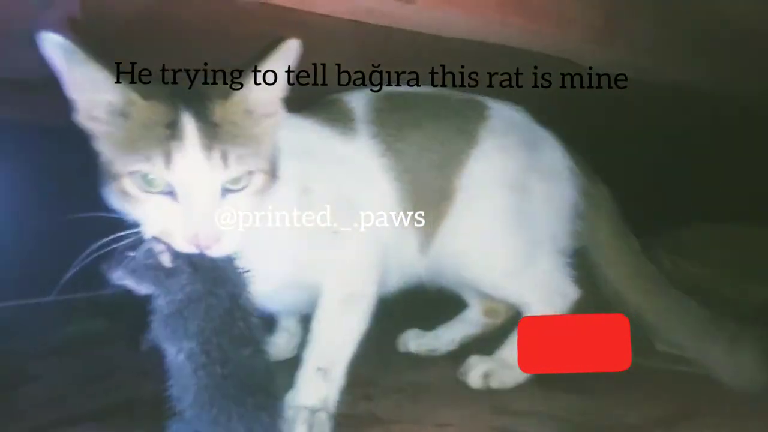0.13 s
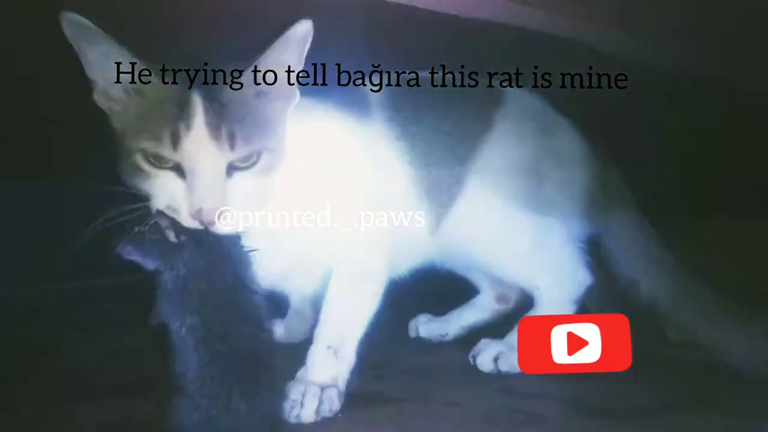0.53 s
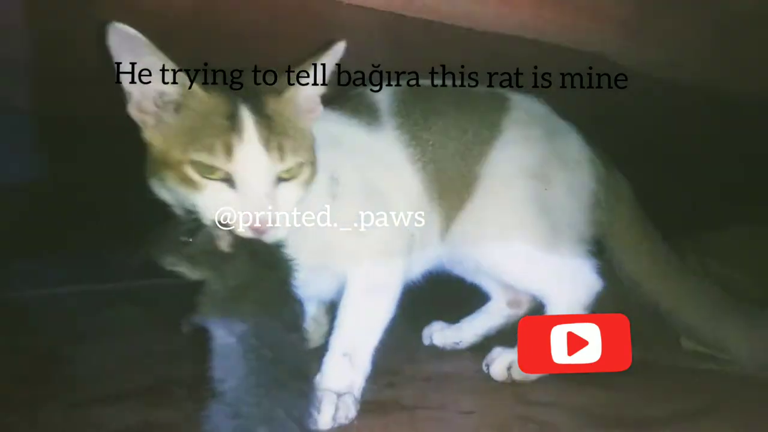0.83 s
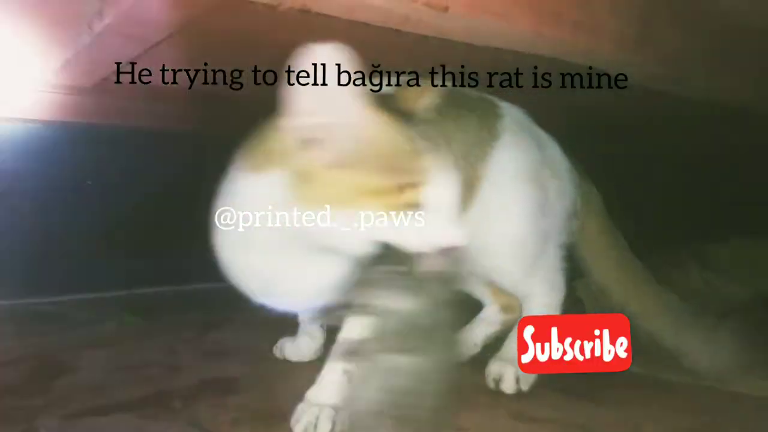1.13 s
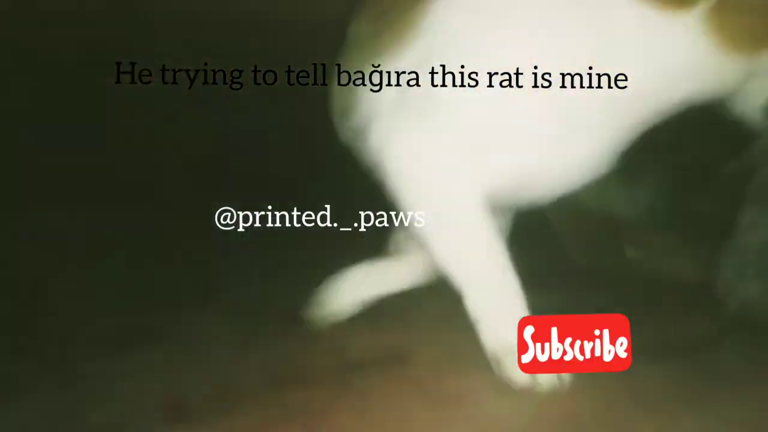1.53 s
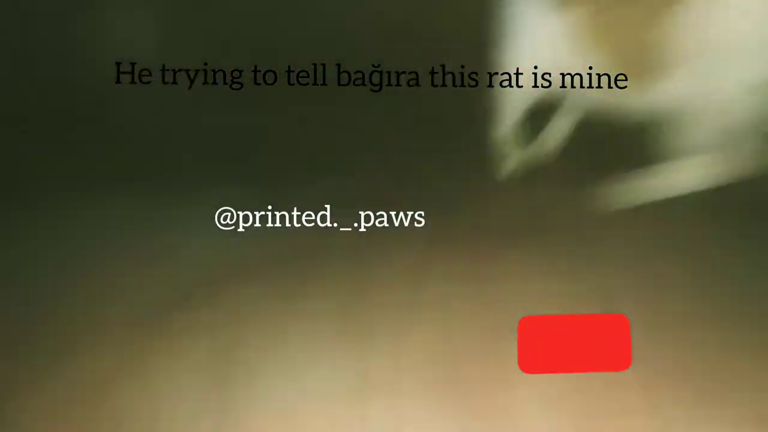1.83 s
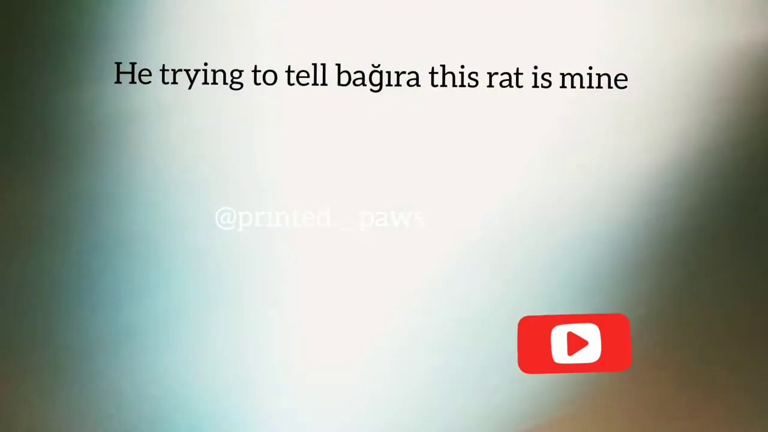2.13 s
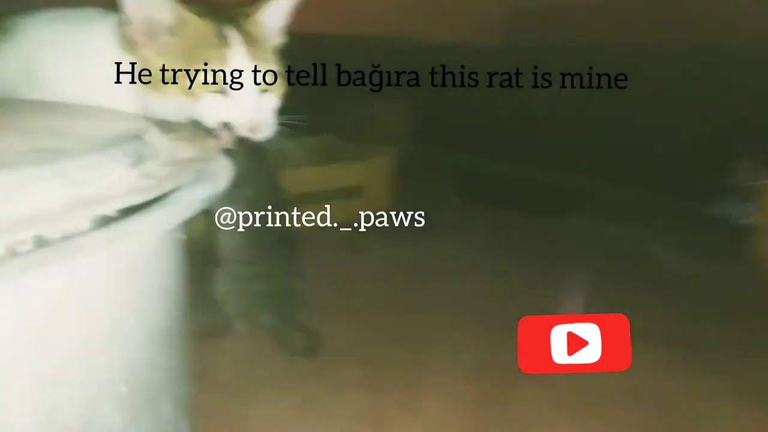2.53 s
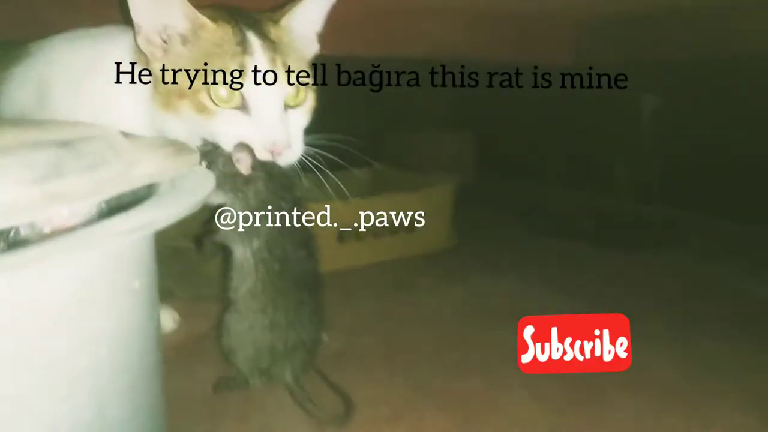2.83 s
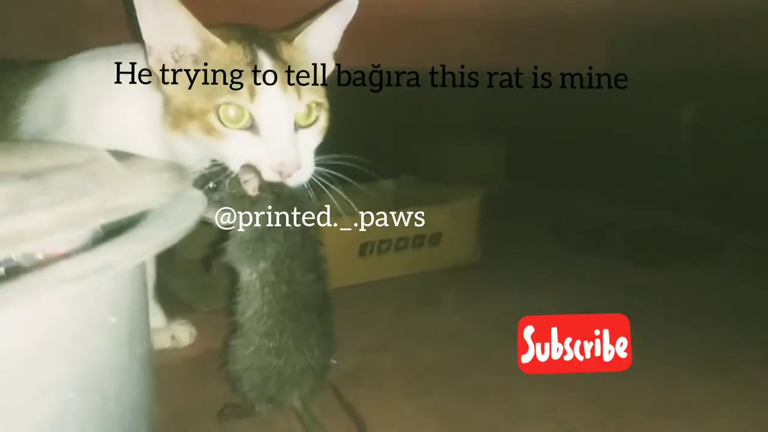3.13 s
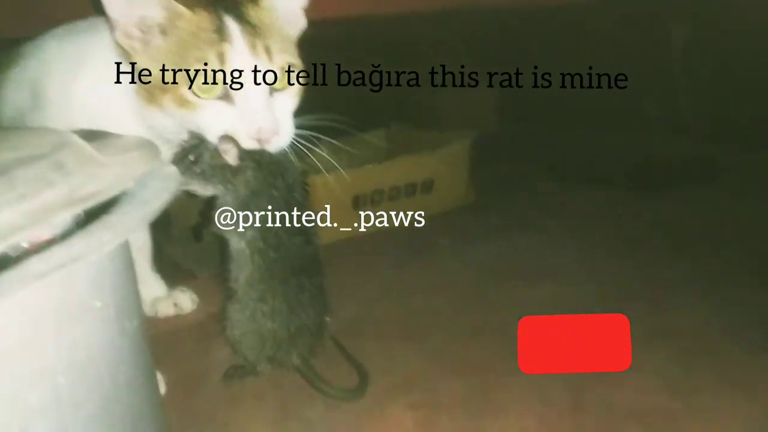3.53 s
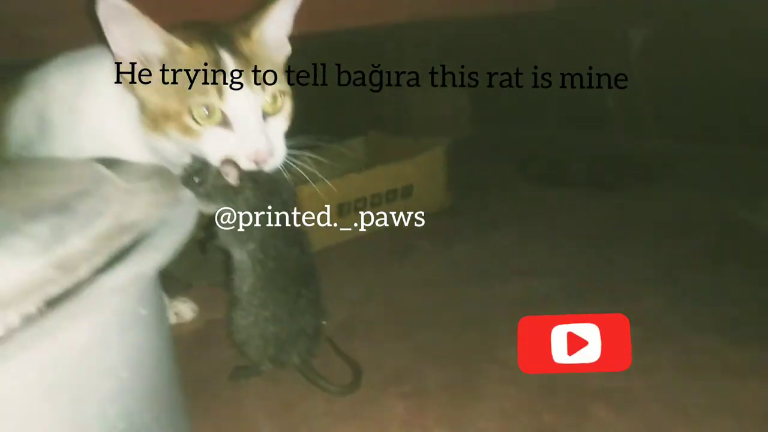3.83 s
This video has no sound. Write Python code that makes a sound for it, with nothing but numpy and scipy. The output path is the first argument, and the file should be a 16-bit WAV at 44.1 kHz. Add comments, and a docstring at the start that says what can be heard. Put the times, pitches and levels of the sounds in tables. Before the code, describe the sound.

A cat growls with a humming rasp, pauses, then growls again more unevenly in a quiet room at night. Close by are soft bumps, rustling clothes and a sharp tick on the left, while a cricket throbs faintly throughout.

```python
"""In a room at night, a cat with a rat in its jaws gives two long closed-mouth growls and slinks off
between them. Its vocal folds hum and flap, and the flaps make its throat and mouth ring with a rasp.
Clothes rustle as a hand-held phone follows close by, with soft bumps, scuffs, knocks and sharp ticks
on the left. Behind it all are the room's hush, a faint whine and a cricket that throbs throughout;
a second insect buzzes for about the first second."""
import sys
import numpy as np
from scipy import signal
from scipy.fft import rfft, irfft
from scipy.io import wavfile
from scipy.ndimage import uniform_filter1d

SR = 44100
rng = np.random.default_rng(int(sys.argv[2]) if len(sys.argv) > 2 else 0)


def bounce(signal):
    """Save signal as a 16-bit WAV file at the path given by the first command-line argument."""
    frames = np.transpose(np.atleast_2d(signal))
    limited = np.clip(frames, -1, 1)
    pcm = np.round(limited * 32767).astype(np.int16)
    wavfile.write(sys.argv[1], SR, pcm)


N = 176400  # 4 seconds


def undb(db):
    """Turn decibels into a gain to multiply by."""
    return 10 ** (np.asarray(db) / 20)


def unit(x):
    """Scale a signal to an average strength (rms) of 1."""
    return x / np.sqrt(np.mean(x ** 2))


def times():
    """The time of every sample."""
    return np.arange(N) / SR


def curve(rows, column=1):
    """One column of a table, joined by straight lines in time."""
    rows = np.array(rows, float)
    return np.interp(times(), rows[:, 0], rows[:, column])


def fader(rows, column=1):
    """Gain from a dB column, silent outside the table's span."""
    inside_s = np.minimum(times() - rows[0][0], rows[-1][0] - times())
    return undb(curve(rows, column)) * np.clip(inside_s / 0.0034 + .5, 0, 1)


def pan(db):
    """Left and right gains, with the left louder by db."""
    return unit(undb(np.array([[db], [-db]]) / 2))


def walk(rate_hz):
    """A smooth random wander of size 1; a higher rate moves faster."""
    freqs = np.fft.rfftfreq(N, 1 / SR)
    return unit(irfft(rfft(rng.standard_normal(N)) / (1 + (freqs / rate_hz) ** 4), N))


def ring(x, hz, width):
    """A resonance: keep a narrow band around one pitch, filtering twice."""
    b, a = signal.iirpeak(min(hz, .45 * SR), hz / width, fs=SR)
    return signal.lfilter(b, a, signal.lfilter(b, a, x))


def noise_band(hz, width):
    """Stereo noise around one pitch."""
    return ring(rng.standard_normal((2, N)), hz, width)


def air(colour, alike_hz=600):
    """Wide stereo noise of a given tone colour, alike on both sides in the bass."""
    freqs = np.fft.rfftfreq(N, 1 / SR) + 1
    hz, db = np.array(colour, float).T
    mid, side = rfft(rng.standard_normal((2, N))) * undb(np.interp(np.log(freqs), np.log(hz), db))
    alike = .9 / (1 + (freqs / alike_hz) ** 4)
    return unit(irfft(mid * np.sqrt(1 + alike) + side * np.sqrt(1 - alike) * np.array([[1], [-1]]), N))


def room(x, echo_db, fade_s=0.2):
    """The direct sound plus a short echo that differs left and right."""
    t = times()[:SR // 2]
    tail = rng.standard_normal((2, len(t))) * undb(-60 * t / fade_s)
    tail /= np.sqrt(np.sum(tail ** 2, axis=1, keepdims=True))
    return x + undb(echo_db) * signal.fftconvolve(x[None], tail, axes=1)[:, :N]


def hush():
    """The quiet room: soft, almost steady noise."""
    # tone colour of the hush (frequency [Hz], relative level [dB])
    colour = [(25, -35), (60, -17), (170, -19), (300, -6.5), (480, 2.5), (750, 1), (1050, -1.5), (1450, 2),
              (2200, -3.5), (3200, -8.5), (4300, -10), (4750, -18.5), (6000, -15), (9000, -20),
              (10300, -17), (13000, -27.5), (15000, -20.5)]
    return undb(-51.5 + .5 * walk(9.9)) * air(colour) * pan(1.5)


def whine(wander_hz=29.84):
    """A faint far-off whine: a narrow band of noise whose pitch wavers."""
    band = signal.hilbert(noise_band(1221.5, width=130))
    waver = np.exp(2j * np.pi * np.cumsum(wander_hz * walk(8.83)) / SR)
    return undb(-55) * unit(np.real(band * waver)) * pan(7.5)


def crickets(pitch_hz=7676, rise_hz_per_s=23.1, scatter_hz=59.2, half_chirp_s=0.02):
    """One cricket's chirps, blurred by distance, over a far chorus that throbs with them."""
    # chirps (time [s], relative level [dB])
    chirps = [(.01, -51), (0.121, -49), (.23, -55.5), (0.349, -51.5), (0.471, -53), (.55, -52), (.65, -52),
              (0.779, -49), (.86, -52), (.99, -50), (1.09, -54), (1.231, -60), (1.36, -51), (1.47, -48),
              (1.56, -52), (1.679, -48.5), (1.791, -54), (1.881, -46.5), (1.98, -47), (2.09, -51.5),
              (2.2, -45.5), (2.3, -53), (2.41, -55), (2.529, -44.5), (2.63, -45.5), (2.72, -48.5),
              (2.852, -49), (2.96, -51), (3.049, -56), (3.15, -51), (3.27, -52.5), (3.38, -48),
              (3.46, -51.5), (3.59, -49.5), (3.689, -45.5), (3.8, -53), (3.91, -45.5)]
    t = times()
    song = signal.hilbert(noise_band(pitch_hz, width=140))
    song /= np.sqrt(uniform_filter1d(np.mean(song.real ** 2, axis=0), size=1500))  # even out the level
    cricket, throb = np.zeros((2, N)), np.zeros(N)
    for (at, db), chance in zip(chirps, rng.standard_normal(len(chirps))):
        near = abs(t - at) < .1
        age = t[near] - at
        swell = undb(db) * np.exp(-(age / half_chirp_s) ** 2 / 2)
        shift_hz = rise_hz_per_s * at + scatter_hz * chance
        cricket[:, near] += swell * np.real(song[:, near] * np.exp(2j * np.pi * shift_hz * age))
        throb[near] += swell
    chorus = (undb(-55.5) + undb(-9) * throb) * unit(noise_band(pitch_hz, width=440))
    return cricket + chorus


def insect_buzz(end_s=1.21, fade_s=0.15):
    """A second insect: a steady high buzz that dies away."""
    # bands of the buzz (centre [Hz], width [Hz], relative level [dB])
    bands = [(3980, 210, -66.5), (4218, 86, -63), (11750, 120, -71)]
    buzz = sum(undb(db) * unit(noise_band(hz, width)) for hz, width, db in bands)
    return buzz * np.clip((end_s - times()) / fade_s, 0, 1)


def clothes(grain_db=0.86, patchy_db=2):
    """Cloth sliding: a grainy hiss whose colour shifts, above a duller swish."""
    # hiss of the cloth (time [s], level [dB], left minus right [dB])
    rustle = [(1.8, -75, 11), (2.02, -56.5, 6.5), (2.15, -43, 0), (2.27, -40, 0.5), (2.42, -40.5, 1),
              (2.58, -50.5, 2), (2.68, -54.5, 3.5), (2.78, -42.5, 5), (2.88, -57.5, 0.5),
              (3.02, -54.5, 2.5), (3.06, -42, 4), (3.1, -40, 1.5), (3.17, -44, 1.5), (3.26, -45.5, 2.5),
              (3.35, -54.5, 2), (3.58, -61, 5), (3.72, -55, -3), (3.85, -80, 12)]
    # its tone colour (frequency [Hz], relative level [dB])
    cloth_colour = [(600, -18), (1500, -12), (3600, -5.5), (4900, -7), (6500, -3), (8500, -2),
                    (10500, -4.5), (12000, -10.5), (15500, -9)]
    # swish of the movement (time [s], level [dB])
    swish_levels = [(1.7, -69), (2.0, -51.5), (2.25, -44.5), (2.55, -46), (2.7, -51), (3.0, -48),
                    (3.3, -52), (3.6, -52.5), (4, -62.5)]
    # its tone colour (frequency [Hz], relative level [dB])
    swish_colour = [(300, -15), (440, 5), (680, -21), (850, 1.5), (1250, -0.5), (1600, -4), (2400, -4),
                    (4000, -11), (9000, -52)]
    cloth = air(cloth_colour)
    patches = sum((undb(patchy_db * walk(12)) - 1) * ring(cloth, hz, hz / 4)
                  for hz in np.geomspace(1500, 14000, 10))
    hiss = (cloth + patches) * fader(rustle) * undb(grain_db * walk(85))
    swish = air(swish_colour) * fader(swish_levels) * undb(2.35 * walk(22))
    sides = undb(curve(rustle, column=2) * np.array([[1], [-1]]) / 2)
    return (hiss + swish) * sides


def bumps():
    """Soft bumps: low, unsteady tones that swell and fade."""
    # bumps (time [s], pitch [Hz], half length [s], level [dB])
    hits = [(0.565, 81.9, 0.017, -52), (1.07, 87.9, 0.017, -41), (1.469, 217, 0.007, -47.5),
            (1.634, 260, 0.012, -58), (1.726, 331.6, 0.011, -47.5), (1.809, 334.7, 0.029, -48.5),
            (1.957, 270, 0.011, -44), (2.032, 81.2, 0.024, -45.5), (2.661, 79.9, 0.018, -54)]
    out = np.zeros((2, N))
    for at, hz, half_s, db in hits:
        phase = 2 * np.pi * np.cumsum(hz * (1 + 0.1006 * walk(69))) / SR
        wave = np.sin(phase + .5 * np.array([walk(95), walk(62.6)]))  # each side wobbles its own way
        out += undb(db) * unit(wave) * np.exp(-((times() - at) / half_s) ** 2 / 2)
    return out


def scuffs():
    """Brief rubs: bursts of grainy noise."""
    # rubs (time [s], half length [s], level [dB], left minus right [dB], centre [Hz], width [Hz])
    rubs = [(1.04, 0.037, -51.5, 7, 14300, 4500), (1.532, .02, -51.5, 7, 2300, 550),
            (2.548, 0.037, -43.5, 8, 1350, 392), (1.537, 0.012, -43, 6, 7200, 3000),
            (1.538, 0.016, -48.5, 8, 13500, 6000), (3.426, 0.0068, -37.5, 25, 9260, 2000),
            (3.579, 0.0071, -41, 0, 1054, 500), (3.616, 0.0078, -31, 35, 10660, 6620),
            (3.617, 0.016, -37.5, 22, 3330, 4000)]
    out = np.zeros((2, N))
    for at, half_s, db, pan_db, hz, width in rubs:
        grains = rng.standard_normal((2, N)) * undb(2.2 * walk(350))
        swell = np.exp(-abs(times() - at) / half_s)
        out += undb(db) * pan(pan_db) * unit(ring(grains, hz, width)) * swell
    return out


def knocks(decay_s=0.005):
    """Small knocks that ring briefly as the cat moves off."""
    # knocks (time [s], pitch [Hz], peak level [dB])
    hits = [(1.21, 2200, -52.5), (1.487, 687, -53)]
    out = np.zeros(N)
    for at, hz, db in hits:
        age = np.maximum(times() - at, 0)
        out += undb(db) * np.sin(2 * np.pi * hz * age) * age / decay_s * np.exp(1 - age / decay_s)
    return out


def ticks(decay_s=0.00034):
    """Sharp ticks by the left microphone, one far louder than the rest; each dies at once."""
    # ticks (time [s], relative level [dB], pitch [Hz])
    hits = [(3.4245, -23.5, 4400), (3.6163, -11, 3770), (3.621, -28, 3320)]
    out = np.zeros(N)
    for at, db, hz in hits:
        age = np.maximum(times() - at, 0)
        out += undb(db) * np.sin(2 * np.pi * hz * age) * np.exp(-age / decay_s)
    return out * pan(33)


def flaps(rate_hz, timing_jitter=.16, scatter_db=2.0):
    """Slow, uneven pulses of the vocal folds."""
    gap_chance, level_chance = rng.standard_normal((400, 2)).T
    at = (np.cumsum(np.exp(timing_jitter * gap_chance)) / rate_hz * SR).astype(int)
    return np.bincount(at[at < N], undb(scatter_db * level_chance[at < N]), N)


def rasp(flutter_hz, puff_s=0.0069):
    """The flaps and their puffs of air make the throat and mouth ring."""
    # strength of the rasp (time [s], relative throat level [dB], relative mouth level [dB])
    levels = [(0, -55, -65), (.17, -44, -47.5), (.34, -44.5, -51.5), (.56, -51, -54), (.665, -49, -68),
              (.685, -40, -42.5), (.76, -58, -53.5), (.87, -39.5, -61), (.91, -51, -80), (.96, -44, -54),
              (1.11, -44, -57), (1.19, -51, -61), (1.25, -101, -70), (1.96, -77, -84), (2.02, -52, -66),
              (2.12, -66, -58), (2.45, -73, -65), (2.52, -50, -48.5), (2.68, -52.5, -46.5),
              (2.77, -40, -44.5), (2.95, -49.5, -40.5), (3.12, -39.5, -40.5), (3.26, -43.5, -43.5),
              (3.3, -56, -49), (3.38, -41, -40.5), (3.55, -52.5, -45.5), (3.67, -54, -56), (3.75, -66, -85),
              (3.84, -43.5, -77), (3.96, -84, -78)]
    # throat resonances (centre [Hz], width [Hz], relative level [dB])
    throat = [(263, 17.6, 1.5), (342.5, 77, -0.5)]
    # mouth resonances (centre [Hz], width [Hz], relative level [dB])
    mouth = [(428.7, 50, 2.5), (488.3, 53, 5), (544, 83, -8), (764, 87, -12)]
    pulses = flaps(flutter_hz)
    puffs = signal.lfilter([1], [1, -np.exp(-1 / (puff_s * SR))], pulses) * rng.standard_normal(N)
    drive = unit(pulses) + unit(puffs)
    out = np.zeros(N)
    for resonances, gain_db, column in [(throat, -2, 1), (mouth, -3, 2)]:
        ringing = unit(sum(undb(db) * ring(drive, hz, width) for hz, width, db in resonances))
        out += undb(gain_db) * ringing * fader(levels, column)
    return out


def throat_tone(flutter_hz, pitch_jitter=0.044, catch_db=8, half_catch_s=0.0036):
    """The hum of the vocal folds: it catches now and then, and beats with a second vibration."""
    # the voice (time [s], pitch [Hz], roughness [0-1], second vibration against the first [dB])
    voice = [(0, 180.6, 0.11, -22), (.14, 181.7, 0.15, -20), (.2, 181, 0.21, -9.5), (.66, 182, 0.25, -18.5),
             (.72, 175.2, 0.06, -8), (.88, 174.2, 0.22, -11.5), (.98, 154, 0.14, -9),
             (1.06, 157.2, 0.5, -4), (1.1, 101.4, 0.7, -1), (1.24, 99.5, 0.42, -6),
             (2.03, 138.5, 0.36, -7.5), (2.15, 146, 0.29, -3.5), (2.62, 147.4, 0.22, -2),
             (2.8, 158, 0.36, -11), (3.3, 154, 0.28, -7), (3.55, 163, 0.35, -15), (3.63, 194, 0.25, -4.5),
             (3.8, 177.3, 0.11, -35), (3.94, 156, 0.2, -25)]
    # deep catches in the voice (time [s], level change [dB])
    catches = [(.2, -18), (.256, -17), (.42, -10), (.505, -22), (.73, -32), (.756, -20)]
    # second and third harmonics (relative level [dB])
    overtones_db = [-26.5, -31]
    rough = np.clip(curve(voice, column=2), 0, 1)
    pitch_hz = curve(voice) * (1 + pitch_jitter * rough * walk(39.8))
    phase = 2 * np.pi * np.cumsum(pitch_hz) / SR + 2 * rough * walk(31)
    beat = 2 * np.pi * np.cumsum(flutter_hz * (1 + 0.17 * rough * walk(18))) / SR
    second_gain = undb(curve(voice, column=3))
    small_dips = unit(undb(-catch_db * rough * np.maximum(walk(33.0), 0) ** 2))
    deep_dips = undb(sum(db * np.exp(-((times() - at) / half_catch_s) ** 2 / 2) for at, db in catches))
    overtones = sum(undb(db) * np.sin(k * phase) for k, db in enumerate(overtones_db, start=2))
    hum = np.sin(phase) + overtones * (1 + np.cos(beat)) + second_gain * np.sin(phase + beat)
    return small_dips * deep_dips * hum / np.hypot(1, second_gain)


def growls(flutter_hz=58.91):
    """The cat's two growls: hum and rasp together, with a little room echo."""
    # strength of the hum, one list per growl (time [s], relative level [dB])
    efforts = [
        [(0.0, -36), (0.06, -32.5), (0.158, -32.5), (0.185, -36.5), (0.22, -33), (0.66, -32.5), (0.784, -31.5),
         (0.926, -39), (1.036, -35.5), (1.092, -43.5), (1.12, -47), (1.138, -47.5), (1.206, -41.5), (1.27, -72)],
        [(1.98, -52), (2.016, -54), (2.04, -40), (2.06, -33), (2.092, -42), (2.114, -40.5), (2.28, -37.5),
         (2.33, -42.5), (2.358, -39), (2.472, -42.5), (2.524, -41), (2.678, -41.5), (2.702, -44), (2.73, -42),
         (2.75, -41), (2.836, -46), (2.852, -36), (2.91, -45), (2.942, -31.5), (2.978, -47.5), (3.05, -29.5),
         (3.078, -48), (3.105, -33), (3.135, -50), (3.17, -35), (3.196, -55), (3.22, -41), (3.245, -36.5),
         (3.268, -29.5), (3.292, -56), (3.314, -34), (3.354, -38.5), (3.4, -57), (3.422, -39.5), (3.492, -41),
         (3.516, -48.5), (3.544, -36), (3.588, -42), (3.634, -37), (3.776, -38.5), (3.834, -44), (3.884, -33.5),
         (3.908, -44.5), (3.942, -38), (3.98, -104)],
    ]
    rasping = rasp(flutter_hz)
    hum = undb(4) * sum(fader(rows) for rows in efforts) * throat_tone(flutter_hz)
    return room(hum, echo_db=-12) + room(rasping, echo_db=-7)


def scene():
    """The cat and the rustling over the night background, which dips a little between the growls."""
    room_tone = hush() + whine()
    close_sounds = growls() + clothes() + bumps() + scuffs() + knocks() + ticks()
    insects = (crickets() + insect_buzz()) * pan(1.5)
    dip = undb(-2 * np.exp(-((times() - 1.4) / 0.71) ** 2))
    return (room_tone + insects) * dip + close_sounds


def record(dry, top_hz=15850):
    """The phone cuts the highest treble."""
    return signal.sosfilt(signal.ellip(10, .2, 80, top_hz, fs=SR, output="sos"), dry)


dry = scene()
out = record(dry)
bounce(out)
```